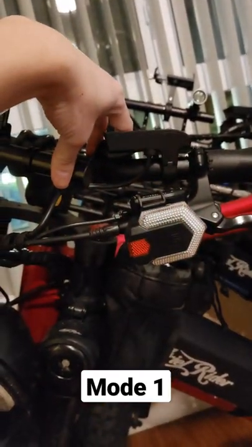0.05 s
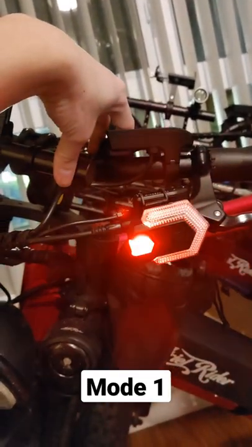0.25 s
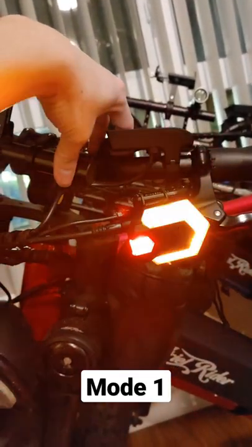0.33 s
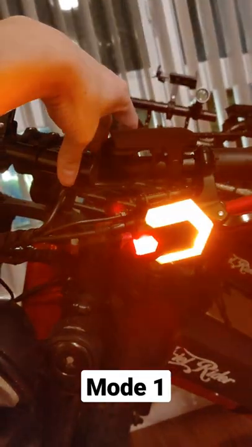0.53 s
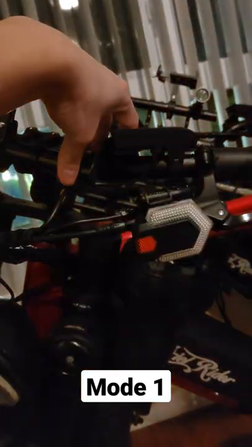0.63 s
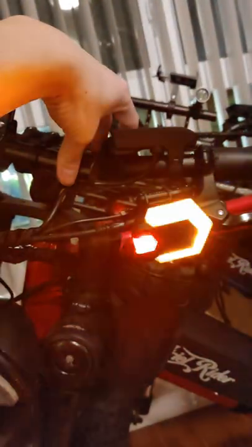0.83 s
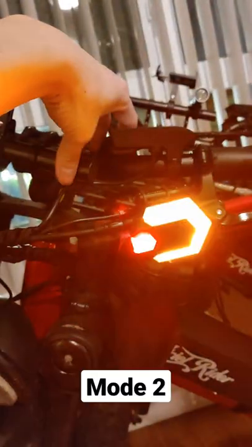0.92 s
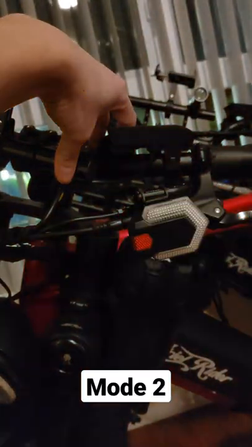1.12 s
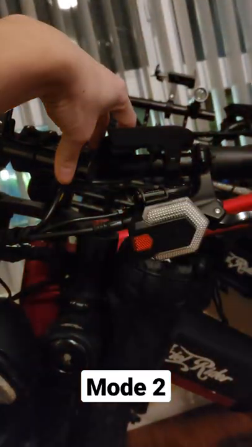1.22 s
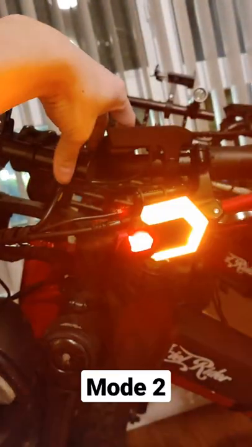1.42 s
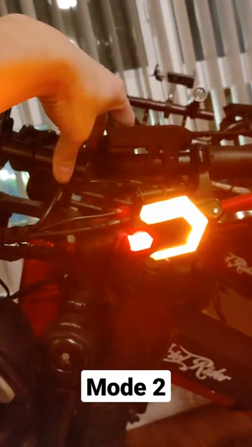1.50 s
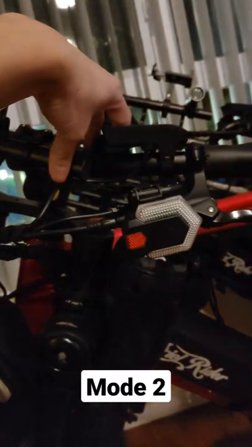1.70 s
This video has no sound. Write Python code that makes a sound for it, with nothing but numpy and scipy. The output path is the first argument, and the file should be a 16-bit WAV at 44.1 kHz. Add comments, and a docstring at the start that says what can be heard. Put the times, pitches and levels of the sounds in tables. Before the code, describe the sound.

Two crisp button clicks close by, slightly right, the second duller, over very faint appliance hum.

```python
"""In a small room, close by and a little to the right, a plastic push button on a bicycle handlebar is
pressed and let go. Its spring snaps twice, each time an impulse shaped by a spectrum: bright going in,
duller coming back. Each snap rings the housing, a sum of decaying modes. Decaying noise gives the scatter
off handlebar and hand and the room's answer; delayed copies give a contact bounce and early reflections.
A tiny tick follows. Beneath lie filtered background noise and an appliance's faint hum, drone and whine."""
import sys
import numpy as np
from scipy import signal
from scipy.fft import rfft, irfft, next_fast_len
from scipy.io import wavfile
from scipy.ndimage import map_coordinates

SR = 44100
rng = np.random.default_rng(int(sys.argv[2]) if len(sys.argv) > 2 else 0)


def master_out(mix):
    """Clip the mix to full scale and print it as 16-bit PCM to the path in sys.argv[1]."""
    frames = np.transpose(np.atleast_2d(mix))
    ceiling = np.clip(frames, -1, 1)
    pcm = np.round(ceiling * 32767).astype(np.int16)
    wavfile.write(sys.argv[1], SR, pcm)


N = 77175

# Spectral shape of the background noise: [f/Hz, relative density/dB per Hz]
BACKGROUND_SPECTRUM = [(20, -32.5), (53, -33), (80, -19), (113, -19.5), (200, -9.5), (300, -7.5),
                       (430, -11), (520, -18), (750, -17.5), (1900, -23), (2950, -19.5), (3600, -25.5),
                       (5400, -32), (6500, -33.5), (7600, -38.5), (11700, -37.5), (12800, -46),
                       (15800, -50)]
BACKGROUND_DB = -64.5  # rms
# Left-right likeness of the background noise: alike in the bass, wide in the middle,
# nearly mono at the top: [f/Hz, likeness/1]
BACKGROUND_LIKENESS = [(60, 0.81), (150, 0.89), (380, 0.78), (800, 0.036), (5500, 0.021), (7500, 0.91),
                       (15000, 1)]
# Noise bands of the appliance's hum: [f/Hz, level/dB, half-width at half amplitude/Hz, likeness/1]
HUM_BANDS = [(122.1, -84.5, 2.5, 1), (199, -81, 6.9, 1), (337.3, -77, 5.1, 0.95), (434.4, -79, 16, 0.75),
             (503.7, -81.5, 21, 0.25), (1210, -85, 8.6, 0.13)]
DRONE_HZ, DRONE_DB = 319, -72.5
DRONE_SWAY_DB, DRONE_DRIFT_RAD, DRONE_SWAY_RATE = 2.5, 0.7, 12  # rate in knots per second
# Course of the appliance's whine, before its sway: [t/s, level/dB]
WHINE_COURSE = [(0, -84), (1.0, -81), (1.25, -85.5), (1.44, -76.5), (1.57, -91), (1.66, -78.5),
                (1.75, -77.5)]
WHINE_HZ, WHINE_SWAY_DB, WHINE_SWAY_RATE = 3079.5, 1.3, 12  # rate in knots per second

# Reverberation time of the room: [f/Hz, t60/s]
ROOM_T60 = [(500, 0.28), (3000, 0.23), (6500, 0.24), (10000, 0.16), (15000, 0.104)]
# Colour of the sound fed to the room: [f/Hz, gain/dB]
ROOM_COLOUR = [(500, -19), (1500, 0.5), (3000, 5), (5000, 0), (6500, -2), (8000, 0), (11000, 4.5),
               (15000, 16.5)]
ROOM_DELAY_S, ROOM_LEFT_DB = 0.0067, -2.5
ROOM_GRAIN_DB = 0.5  # unevenness of the tail
ROOM_RING_DB = -24  # the housing's ring carries less far than the crack
# Single copies after each snap: first a contact bounce at 4 ms, then early reflections
# off nearby surfaces: [delay/s, left level/dB, right level/dB]
SINGLE_COPIES = [(.0042, -22, -20), (.0105, -27, -25), (.0147, -26, -25), (.0196, -31, -30)]
SCATTER_DB, SCATTER_LEFT_DB = 0.5, -5.5
SCATTER_T60_S, SCATTER_DELAY_S = 0.022, 0.000518

# Snaps of the spring, press then release: [t/s, level/dB, then relative to that level: ring/dB,
# upper edge of the ring f/Hz, dry tick/dB, knock of the housing/dB, room/dB]
SNAPS = [(0.2247, -11, -22.5, 13800, 0.5, -32, -3.5), (0.3751, -12, -24, 8700, -34, -17.5, -5)]
# Spectral shapes of the crack, one list for the press and one for the release: [f/Hz, relative level/dB]
CRACK_SPECTRA = [
    [(300, -34), (1800, -27.5), (2900, -28.5), (4300, -23.5), (5300, -10.5), (6250, 1.5), (6600, 1.5),
     (7200, -3), (8000, -1.5), (9800, -17.5), (11600, -12.5), (13200, -31.5), (15500, -30.5)],
    [(300, -40), (1200, -53), (1600, -17), (2200, -31), (2900, -21), (3800, -27.5), (4700, -14.5),
     (5600, -10), (6250, 3), (6600, 0.5), (7200, -8), (8000, -11.5), (9600, -36), (11800, -42),
     (13400, -62.5)],
]
# Modes of the housing: [f/Hz, relative level/dB, t60/s]
HOUSING_MODES = [(2640, -18.5, 0.045), (3360, -22.5, 0.021), (4690, -8.5, 0.031), (4950, 0, 0.028),
                 (5930, -11.5, 0.015), (6300, 10.5, 0.016), (6900, -16.5, 0.014), (7880, -14, 0.025),
                 (8880, -5.5, 0.054), (11240, -8.5, 0.021), (12080, -7.5, 0.056)]
# Spectral shape of the dry tick: [f/Hz, relative level/dB]
TICK_SPECTRUM = [(60, -22), (300, -5.5), (800, 1.5), (1500, -2), (3000, 2.5), (6000, 7.5), (15000, -26)]
TICK_DELAY_S = 0.00008
RING_ATTACK_S = 0.0007
KNOCK_HZ, KNOCK_T60_S, KNOCK_ATTACK_S = 1610, 0.009, 0.001
SING_HZ, SING_DB, SING_T60_S = 6360, -38, 0.38  # the thin after-ring of the spring
LEFT_DB, LEFT_LAG_S = -8, 0.000014  # the left channel is weaker and later
LEAD_S = 0.01  # silence ahead of each snap while it is built
AFTER_TICK_S, AFTER_TICK_DB = 0.3827, -42


def amp(db):
    """Level definition: decibels become an amplitude gain."""
    return 10 ** (np.asarray(db) / 20)


def unit(x):
    """Normalisation: x is scaled to rms 1."""
    return x / np.sqrt(np.mean(x ** 2) + 1e-20)


def along(points, hz):
    """Interpolation: (f/Hz, value) points are read on a logarithmic frequency axis."""
    f, v = np.transpose(points)
    return np.interp(np.log(hz + 1), np.log(f + 1), v)


def filtered(x, response):
    """Linear filtering: the spectrum of x is multiplied by a response of frequency."""
    m = next_fast_len(N + SR // 2)
    hz = np.fft.rfftfreq(m, 1 / SR)
    return irfft(rfft(x, m) * response(hz), m)[..., :N]


def delayed(x, s):
    """Shift theorem: a delay of s seconds is a phase proportional to frequency."""
    return filtered(x, lambda hz: np.exp(-2j * np.pi * hz * s))


def through(x, response):
    """Superposition: mono x is convolved with each channel of an impulse response."""
    return signal.fftconvolve(x[None], np.atleast_2d(response), axes=1)[:, :N]


def echoes(t60, size=256, grain_db=0):
    """Exponential decay: stereo noise of energy 1 per channel loses 60 dB in t60(f) seconds."""
    grain_levels = np.repeat(rng.standard_normal((2, SR // 64)), 32, axis=1)
    grains = amp(grain_db * grain_levels)
    noise = grains * rng.standard_normal(grains.shape)
    hz, t, z = signal.stft(noise, SR, nperseg=size)
    decay = amp(-60 * t / t60(hz)[:, None])
    tail = signal.istft(z * decay, SR, nperseg=size)[1]
    return tail / np.linalg.norm(tail, axis=1, keepdims=True)


def stereo_noise(gain, alike):
    """Mid-side mixing: two noises are weighted for a given left-right likeness over frequency; rms 1."""
    def weights(hz):
        turn = np.arccos(np.clip(alike(hz), -.99, .99)) / 2
        return gain(hz) * np.array([np.cos(turn), np.sin(turn)])

    mid, side = filtered(rng.standard_normal((2, N)), weights)
    return unit(np.array([mid + side, mid - side]))


def wobble(rate):
    """Slow random modulation: a smooth curve through random knots, rate of them a second."""
    knots = rng.standard_normal(64)
    return map_coordinates(knots, [np.arange(N) * rate / SR], mode="mirror")


def background_noise():
    """Stationary filtered noise: alike in the bass, wide in the middle, nearly mono at the top."""
    noise = stereo_noise(lambda hz: amp(along(BACKGROUND_SPECTRUM, hz)),
                         lambda hz: along(BACKGROUND_LIKENESS, hz))
    return amp(BACKGROUND_DB) * noise


def hum():
    """Narrow-band noise: a bell-shaped band makes a tone that wavers at random."""
    def band(centre, width, alike):
        return stereo_noise(lambda hz: 1 / (1 + ((hz - centre) / width) ** 2),
                            lambda hz: np.full_like(hz, alike))

    return sum(amp(db) * band(hz, width, alike) for hz, db, width, alike in HUM_BANDS)


def drone():
    """Amplitude and phase modulation: the appliance's main tone wavers alike in both channels."""
    drift = DRONE_DRIFT_RAD * wobble(DRONE_SWAY_RATE)
    phase = 2 * np.pi * DRONE_HZ * np.arange(N) / SR + drift
    sway = amp(DRONE_SWAY_DB * wobble(DRONE_SWAY_RATE))
    return amp(DRONE_DB) * unit(sway * np.sin(phase))


def whine():
    """Amplitude modulation: a thin sine comes and goes, with its own phase and sway in each channel."""
    t = np.arange(N) / SR
    phase = 2 * np.pi * (WHINE_HZ * t + np.array([[0], [1 / 6]]))  # right leads by a sixth of a cycle
    sway_db = WHINE_SWAY_DB * np.array([wobble(WHINE_SWAY_RATE), wobble(WHINE_SWAY_RATE)])
    level_db = np.interp(t, *np.transpose(WHINE_COURSE)) + sway_db
    return amp(level_db) * unit(np.sin(phase))


def room(x):
    """Reverberation: coloured x excites a decaying tail, weaker on the left."""
    coloured = filtered(x, lambda hz: amp(along(ROOM_COLOUR, hz)))
    tail = through(coloured, echoes(lambda hz: along(ROOM_T60, hz), grain_db=ROOM_GRAIN_DB))
    return amp([[ROOM_LEFT_DB], [0]]) * delayed(tail, ROOM_DELAY_S)


def bounce_and_reflections(x):
    """Discrete repetition: delayed copies of x give a contact bounce, then early reflections."""
    return sum(amp([[left_db], [right_db]]) * delayed(x, s) for s, left_db, right_db in SINGLE_COPIES)


def scatter(x):
    """Scattering: handlebar and hand return a dense, fast-decaying cluster of reflections."""
    near = through(x, echoes(lambda hz: np.full_like(hz, SCATTER_T60_S), size=32))
    return amp(SCATTER_DB) * amp([[SCATTER_LEFT_DB], [0]]) * delayed(near, SCATTER_DELAY_S)


def mode(hz, t60, attack=RING_ATTACK_S):
    """Damped oscillation: a sine from LEAD_S on, with exponential onset and decay."""
    t = np.maximum(np.arange(N) / SR - LEAD_S, 0)
    return np.sin(2 * np.pi * hz * t) * amp(-60 * t / t60) * (1 - np.exp(-t / attack))


def housing_ring(ring_db, edge_hz, knock_db):
    """Modal superposition: low-passed housing modes, with the knock and the spring's after-ring."""
    modes = sum(amp(db) * mode(hz, t60) for hz, db, t60 in HOUSING_MODES)
    ring = amp(ring_db) * filtered(modes, lambda hz: 1 / (1 + (hz / edge_hz) ** 20))
    knock = amp(knock_db) * mode(KNOCK_HZ, KNOCK_T60_S, KNOCK_ATTACK_S)
    sing = amp(SING_DB) * mode(SING_HZ, SING_T60_S)
    return ring + knock + sing


def snap(spectrum, ring_db, edge_hz, tick_db, knock_db, room_db):
    """Impulse excitation: one flip of the spring cracks, rings the housing and excites the room."""
    blow = delayed(signal.unit_impulse(N), LEAD_S)
    crack = filtered(blow, lambda hz: amp(along(spectrum, hz)))
    crack = crack / np.abs(crack).max()
    ring = housing_ring(ring_db, edge_hz, knock_db)
    tick = amp(tick_db) * filtered(blow, lambda hz: amp(along(TICK_SPECTRUM, hz)))

    left = amp(LEFT_DB) * delayed(crack + ring, LEFT_LAG_S)
    right = crack + ring + delayed(tick, TICK_DELAY_S)  # the dry tick is on the right only
    reverberation = amp(room_db) * room(crack + amp(ROOM_RING_DB) * ring)
    return np.array([left, right]) + scatter(crack) + bounce_and_reflections(crack) + reverberation


def after_tick():
    """Unit impulse: a tiny tick with a flat spectrum follows the release."""
    return amp(AFTER_TICK_DB) * delayed(signal.unit_impulse(N), AFTER_TICK_S)


def button():
    """Bistable snapping: the spring flips once as the button goes in and once as it comes out."""
    clicks = np.zeros((2, N))
    for (s, db, *character), spectrum in zip(SNAPS, CRACK_SPECTRA):
        clicks += amp(db) * delayed(snap(spectrum, *character), s - LEAD_S)
    return clicks


def scene():
    """Linear superposition: background noise and appliance tones lie beneath the button."""
    background = background_noise() + hum() + drone() + whine()
    return background + after_tick() + button()


def record(dry):
    """Band limitation: the recorder keeps nothing from 15950 Hz upward."""
    return filtered(dry, lambda hz: hz < 15950)


dry = scene()
out = record(dry)
master_out(out)
```